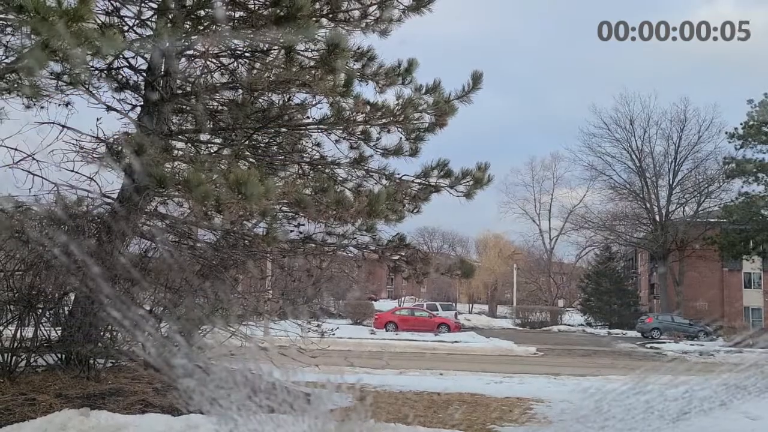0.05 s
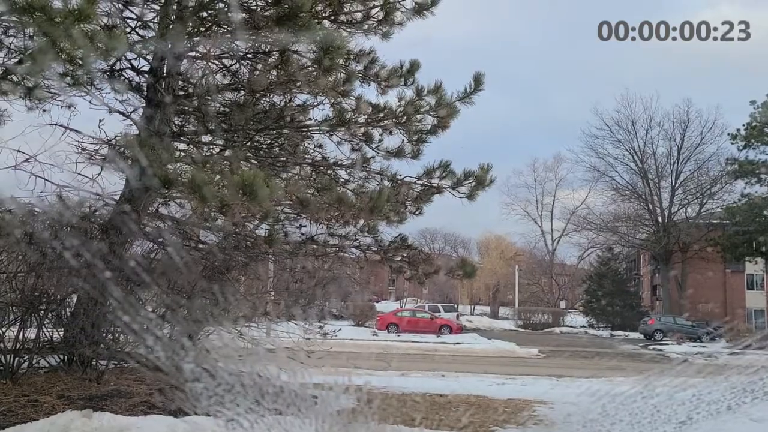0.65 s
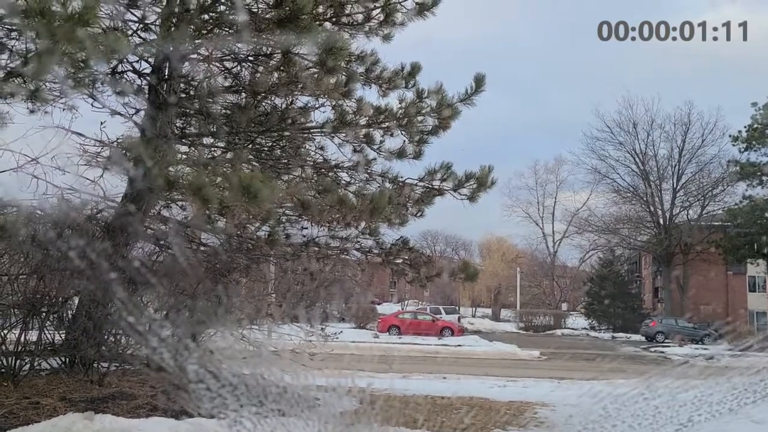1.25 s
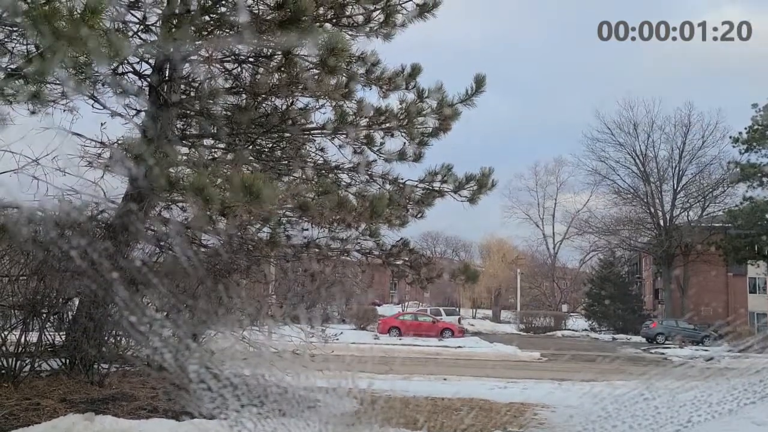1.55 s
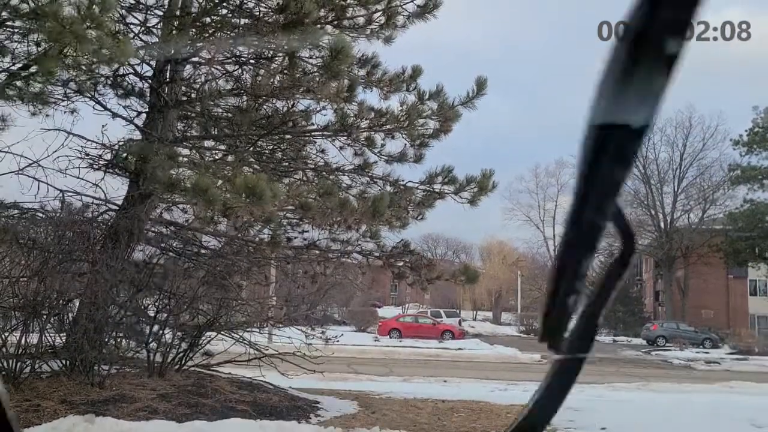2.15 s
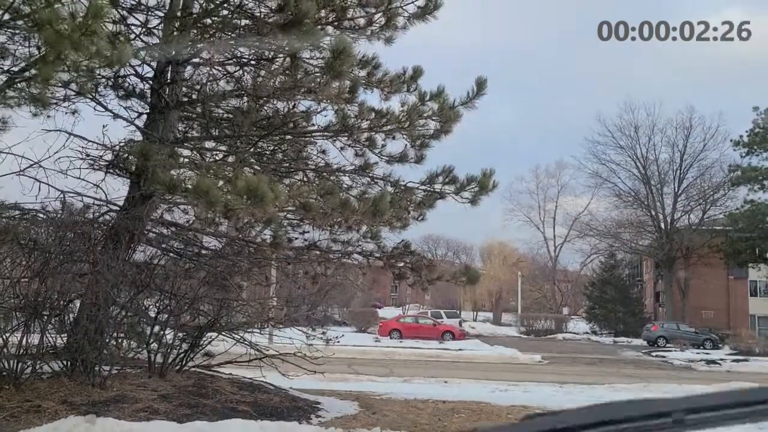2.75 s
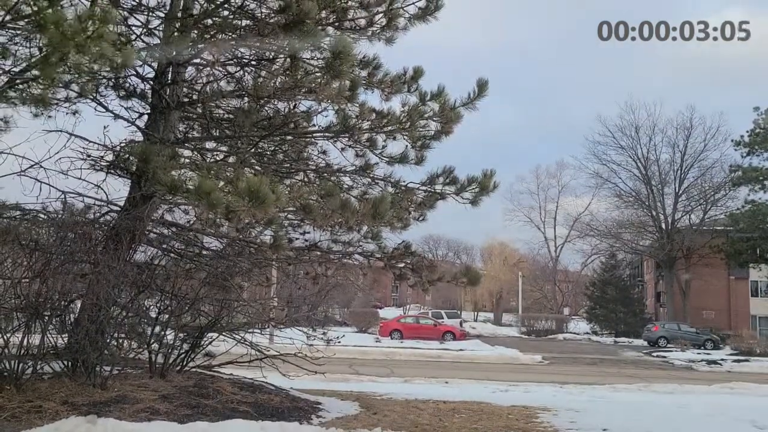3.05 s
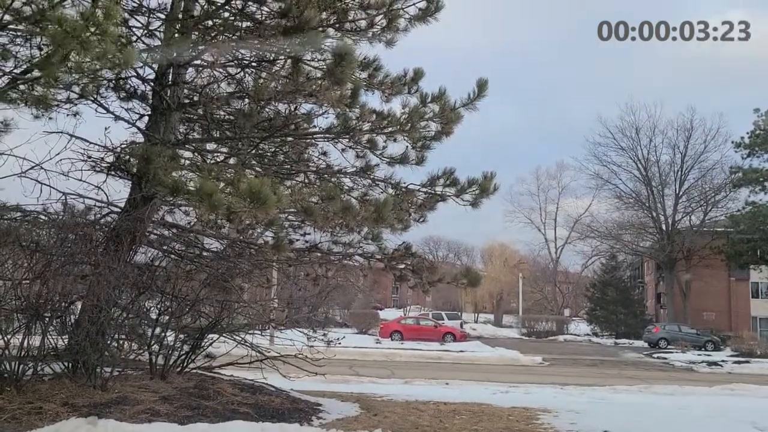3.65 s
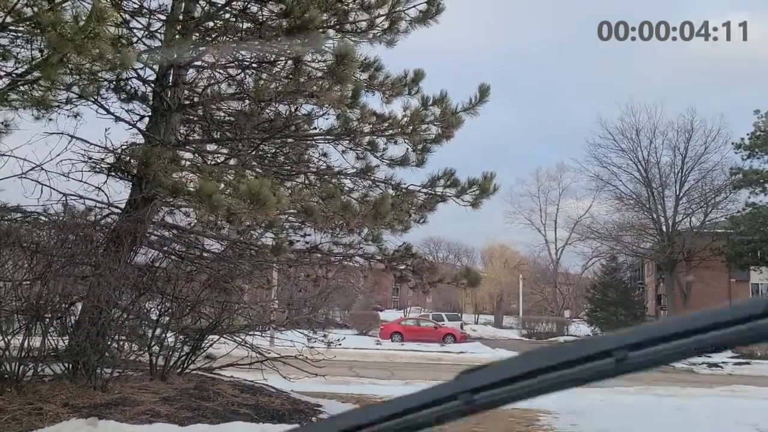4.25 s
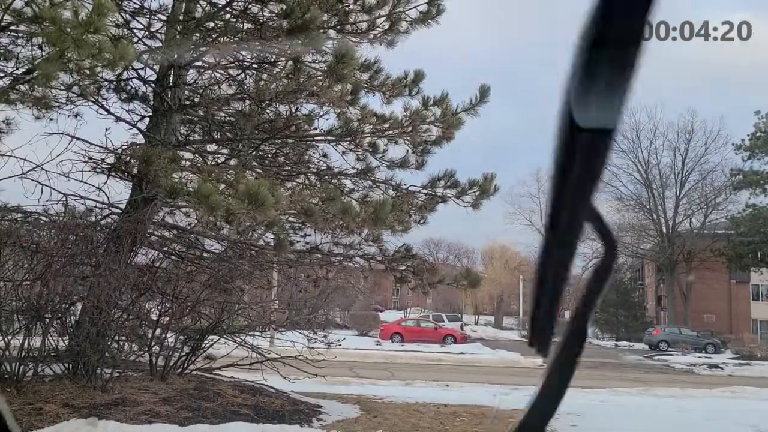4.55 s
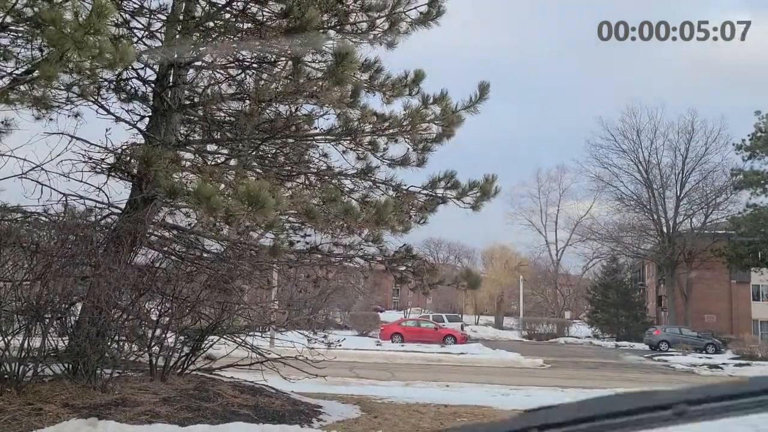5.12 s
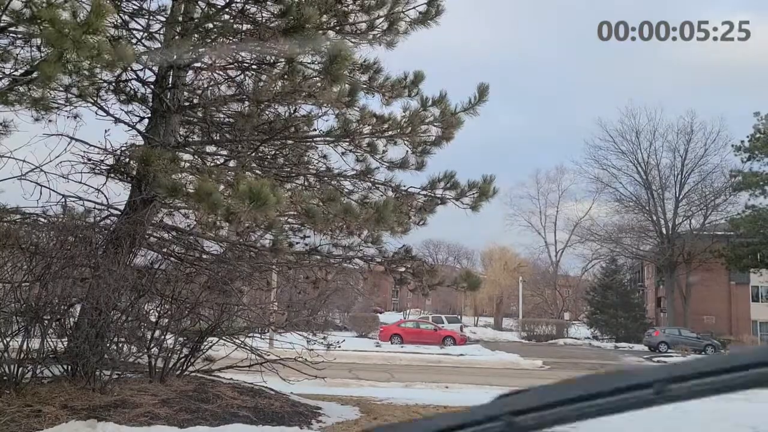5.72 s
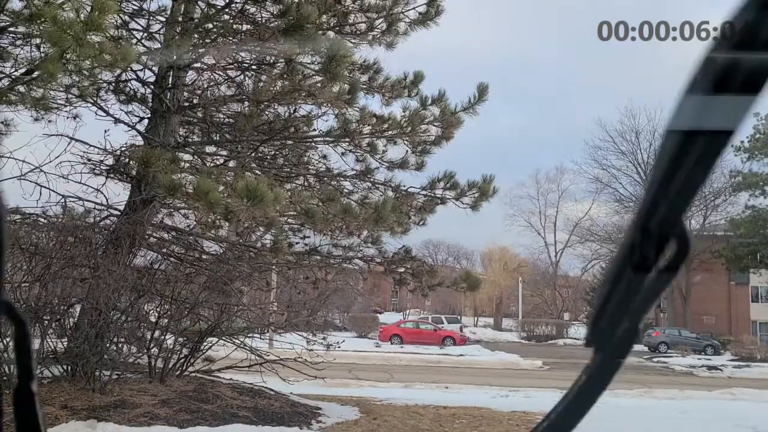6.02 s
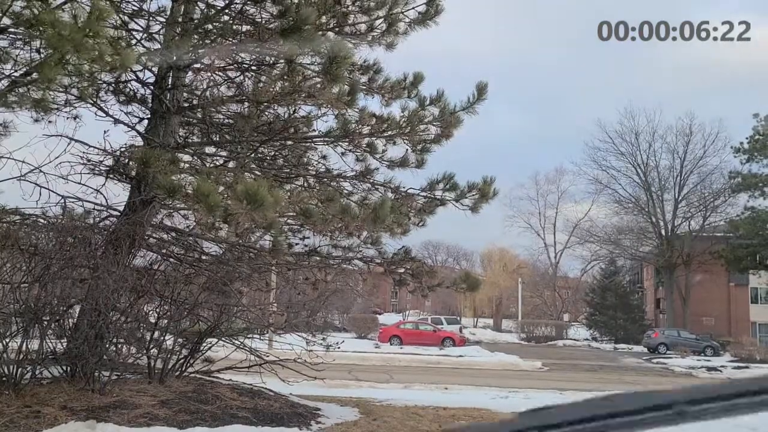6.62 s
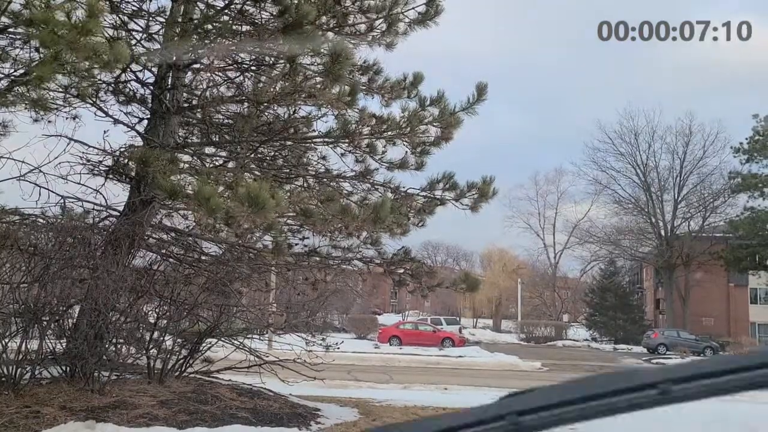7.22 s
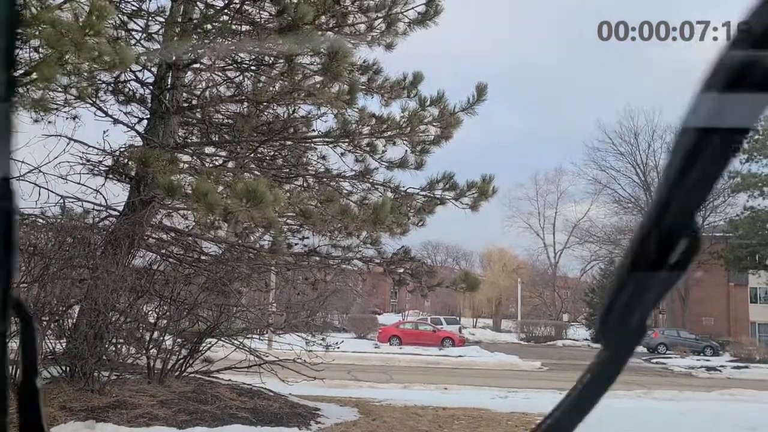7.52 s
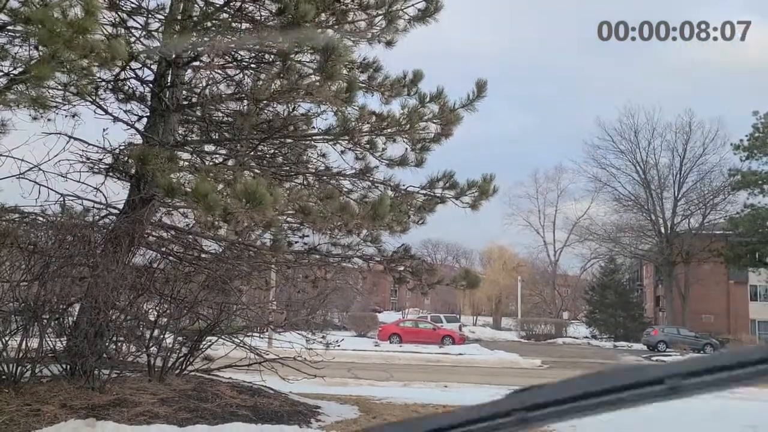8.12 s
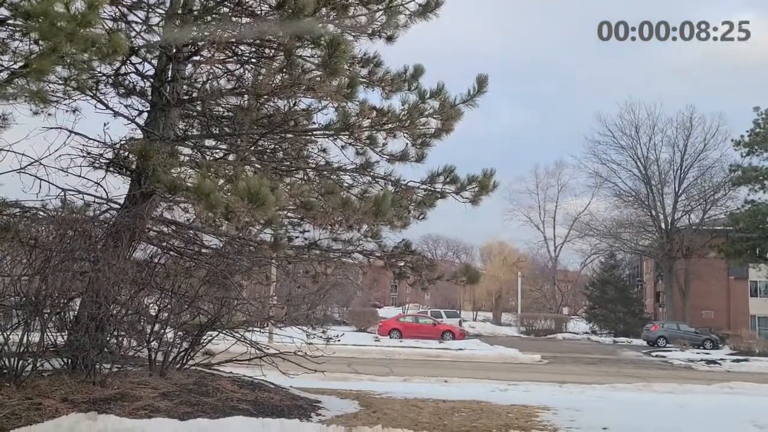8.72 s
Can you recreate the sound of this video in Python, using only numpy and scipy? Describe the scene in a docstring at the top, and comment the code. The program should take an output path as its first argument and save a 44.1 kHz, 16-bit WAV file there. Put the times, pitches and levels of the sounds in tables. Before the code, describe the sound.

A car engine idles with a steady low boom and cabin rumble throughout, heard in stereo from the front seat. A soft click comes at the very start. At 1.6 seconds a plastic stalk switch clacks close by and the wipers sweep the wet windshield with a thin motor whine and a faint rubber swish. The blades flip with a knock at 2.4 and land with a thud and short rubbery grunt at 3.1. After a pause, the switch clacks again at 4 seconds and three wipes follow without a break, turning at about 4.8, 6.3 and 7.8 and thudding down at 5.5, 7 and 8.5. The whine rises through each stroke, with a few faint ticks and scrapes. The switch gives a loud cluster of clacks around 7.7 and another clack at 8. The idle carries on alone until nearly 9 seconds.

```python
"""The low boom of an idling engine and a soft click, from a stereo microphone at a car's front seat.
Close by, the stalk switch clacks and rings its plastic housing. Ahead, wipers sweep the wet windshield:
one wipe, a pause, then three in a row. Their motor whines up through each stroke, the rubber swishes,
and at each turn the blades flip over with a stick-slip grunt and thud against the glass."""
import sys
import numpy as np
from scipy import signal
from scipy.fft import rfft, irfft
from scipy.io import wavfile
from scipy.ndimage import uniform_filter1d

SR = 44100
rng = np.random.default_rng(int(sys.argv[2]) if len(sys.argv) > 2 else 0)


def unload_wav(signal):
    """Save mono or channel-first audio to the path in sys.argv[1] as 16-bit WAV at rate SR, clipped to [-1, 1]."""
    wavfile.write(
        sys.argv[1],
        SR,
        np.round(np.clip(np.atleast_2d(signal).T, -1, 1) * 32767).astype(np.int16),
    )


N = 391166
TIME = np.arange(N) / SR


def amp(db):
    """Decibels to gain."""
    return 10 ** (np.asarray(db) / 20)


def unit(x):
    """Scales to rms 1."""
    return x / np.sqrt(np.mean(x ** 2) + 1e-20)


def curve(points, at):
    """Reads along straight lines between (x, value) points."""
    return np.interp(at, *np.transpose(points))


def log_curve(points, hz):
    """Reads (f/Hz, value) points on a log-frequency axis."""
    f, value = np.transpose(points)
    return np.interp(np.log(hz + 1), np.log(f), value)


def add(mix, s, sound):
    """Adds a sound into the mix at time s."""
    part = mix[:, max(round(s * SR), 0):][:, :sound.shape[-1]]
    part += sound[..., :part.shape[1]]


def drift(rate_hz):
    """Random wander of rms 1, mostly slower than rate_hz."""
    hz = np.fft.rfftfreq(N, 1 / SR)
    return unit(irfft(rfft(rng.standard_normal(N)) * np.exp(-(hz / rate_hz) ** 2), N))


def tone(hz, waver_db, wobble_rad, rate_hz):
    """A sine of rms 1 that wavers in level and phase."""
    phase = 2 * np.pi * np.cumsum(hz) / SR + wobble_rad * drift(rate_hz)[:len(hz)]
    return unit(np.sin(phase) * amp(waver_db * drift(rate_hz)[:len(hz)]))


def swell(length, peak_at):
    """Time axis and envelope of a short rub: a quick rise and a slower fall."""
    t = np.arange(0, length, 1 / SR)
    ramp = np.interp(t, [0, length * peak_at, length], [0, 1, 0])
    return t, np.sin(np.pi / 2 * ramp) ** 2


def strike(t, rise, t60):
    """Envelope of a blow: a quick rise, then a fall of 60 dB every t60 seconds."""
    return (1 - np.exp(-t / rise)) * amp(-60 * t / t60)


def grit(size, spread_db):
    """Two channels of white noise, roughened by a random level on every sample."""
    return rng.standard_normal((2, size)) * amp(spread_db * rng.standard_normal(size))


# likeness of left and right at the microphone: f/Hz, correlation
COHERENCE = [(40, 0.99), (150, 0.94), (300, 0.6), (600, 0)]
def coloured(spectrum, drive):
    """Two unrelated drives become a coloured stereo pair of rms 1, alike in the bass."""
    size = drive.shape[1]
    hz = np.fft.rfftfreq(size, 1 / SR)
    likeness = log_curve(COHERENCE, hz)
    mid, side = rfft(drive) * np.sqrt([1 + likeness, 1 - likeness]) * amp(log_curve(spectrum, hz))
    return unit(irfft([mid + side, mid - side], size))


def noise(spectrum, size):
    """Stereo noise of a given colour."""
    return coloured(spectrum, rng.standard_normal((2, size)))


# glass and dashboard near the microphone: left delay/s, right delay/s, gain
REFLECTIONS = [(.0019, .0021, .28), (.0032, .003, -.28), (.0047, .0049, .28)]
def reflected(x):
    """Nearby hard surfaces comb a stereo sound at unchanged power."""
    out = x.copy()
    for left, right, gain in REFLECTIONS:
        add(out[:1], left, gain * x[:1])
        add(out[1:], right, gain * x[1:])
    return np.std(x) * unit(out)


# rumble all round the microphone, and air from the vents: f/Hz, density/dB
RUMBLE = [(18, -24.5), (34, 6), (58, -1), (95, -4.5), (130, -5.5), (180, -15), (400, -18), (700, -31),
          (1100, -36), (1700, -52), (3000, -74), (16000, -110)]
VENTS = [(940, -30.5), (1900, -5.5), (2400, -10), (2870, -3), (3560, -10), (4100, -12), (4840, -18),
         (7550, -21), (8150, -26), (16000, -22)]
def cabin():
    """A steady rumble fills the car and the vents hiss faintly."""
    return amp(-40.5) * noise(RUMBLE, N) + amp(-77) * reflected(noise(VENTS, N))


# firing rate as the idle settles: t/s, f/Hz
IDLE = [(0, 38.1), (.9, 37.7), (1.6, 36.95), (2.7, 36.65), (5.2, 35.85), (6.8, 36), (7.6, 35.5),
        (8.87, 36.1)]
# engine boom at the seat: multiple of the firing rate, level/dB
BOOM = [(1, -40.5), (2, -39.5), (3, -55), (3.35, -46), (4, -43), (5, -62)]
# panel resonances that carry the belt whine: f/Hz, width/Hz, level/dB
PANELS = [(335.2, 15, -56.5), (509.8, 32, -64), (665.5, 22, -62), (785, 41, -63.5)]
def engine(settled_hz=36, shake_db_per_hz=.42, belt_ratio=4.455):
    """Firing orders boom, harder as the idle slows, under the thin whine of a belt-driven part."""
    firing_hz = curve(IDLE, TIME)
    shake_db = shake_db_per_hz * (settled_hz - firing_hz) - .28
    out = sum(amp(db + shake_db) * tone(k * firing_hz, waver_db=1.5, wobble_rad=.54, rate_hz=5)
              for k, db in BOOM)
    for k, (centre, width, db) in enumerate(PANELS, 2):
        # each belt overtone swells or fades as it slides across its resonance
        hz = k * belt_ratio * firing_hz
        gain = amp(db) / np.hypot(1, 2 * (hz - centre) / width)
        out += gain * tone(hz, waver_db=3, wobble_rad=.57, rate_hz=4)
    return out


# light ticks of the stalk and the blade holders: t/s, level/dB
TICKS = [(1.175, -65), (1.221, -62), (1.425, -61.5), (5.542, -59.5), (7.033, -60.5), (8.185, -56.5)]
# their colour: f/Hz, density/dB
TICK_COLOUR = [(600, -18.5), (1400, -0.5), (3200, 1.5), (5000, -20.5), (16000, -42.5)]
def ticks():
    """Small parts tap and rub against each other, dry and unpitched."""
    out, t = np.zeros((2, N)), np.arange(SR // 6) / SR
    shape = strike(t, rise=.0029, t60=.13)
    for s, db in TICKS:
        add(out, s, amp(db) * shape * coloured(TICK_COLOUR, grit(len(t), spread_db=3)))
    return out


def rest_tick(s=3.089, db=-57, t60=.041):
    """One fine, high tick as the arms settle after the first wipe."""
    out, t = np.zeros((2, N)), np.arange(SR // 10) / SR
    treble = noise([(6500, -32.5), (8500, -3.5), (12500, -5), (14500, -21)], len(t))
    add(out, s, amp(db - 60 * t / t60) * treble)
    return out


# wipes across the glass ahead: start t/s, far turn t/s, back at rest t/s
WIPES = [(1.638, 2.42, 3.13), (4.022, 4.8, 5.53), (5.537, 6.3, 7.03), (7.034, 7.818, 8.505)]
# the motor labours after each turn, speeds up and slows on landing: strokes done (0-2), f/Hz
WHINE_PITCH = [(0, 738), (.25, 703), (.9, 813), (.99, 812), (1.03, 735), (1.17, 716), (1.35, 746),
               (1.69, 815), (1.915, 816), (1.955, 742), (2, 705)]
# its whine at the seat: strokes done (0-2), level/dB
WHINE_LEVEL = [(0, -64), (.3, -63.5), (.72, -66.5), (.93, -61.5), (1.2, -60), (1.45, -64), (1.75, -60.5),
               (2, -63)]
# load in each wipe: pitch lost at the start/Hz, pitch lost at the end/Hz, landing gain/dB
LOAD = [(30, 0, 0), (6, 0, -1), (0, 0, -1), (0, 18, 7)]
def motor(coast_s=.08, coast_hz_per_s=2200, coast_db_per_s=220):
    """Gear whine follows the load through each wipe, then falls and fades as the motor coasts."""
    out = np.zeros((2, N))
    for (start, turn, end), (start_hz, end_hz, landing_db) in zip(WIPES, LOAD):
        t = np.arange(start, end + coast_s, 1 / SR)
        strokes = np.interp(t, [start, turn, end], [0, 1, 2])
        coasted = np.maximum(t - end, 0)
        sag_hz = np.interp(strokes, [0, 1, 2], [start_hz, 0, end_hz])
        strain_db = np.interp(strokes, [1.65, 1.95], [0, landing_db])
        hz = curve(WHINE_PITCH, strokes) - sag_hz - coast_hz_per_s * coasted
        db = curve(WHINE_LEVEL, strokes) + strain_db - coast_db_per_s * coasted
        whine = tone(hz, waver_db=2.3, wobble_rad=.62, rate_hz=34)
        add(out, start, amp(db) * whine * signal.windows.tukey(len(t), .015))
    return out


# catches on the outside of the glass: t/s, level/dB, length/s, centre f/Hz
SCRAPES = [(2.541, -77, 0.057, 7000), (2.904, -75, .016, 5500), (5.063, -58, 0.067, 3580),
           (5.804, -70.5, .08, 3100), (6.436, -73.5, 0.02, 6000), (6.895, -70.5, 0.036, 2900)]
# their colour: multiple of the centre, density/dB
SCRAPE_HUMP = [(.25, -13.5), (1, -0.5), (1.4, -13), (3, -33)]
def scrapes(grain_db=4):
    """Wet rubber catches on drops and grit in short, grainy scrapes."""
    out = np.zeros((2, N))
    for s, db, length, hz in SCRAPES:
        t, shape = swell(length, peak_at=.25)
        grains = rng.standard_normal((2, len(t))) * amp(grain_db * drift(600)[:len(t)])
        hump = [(k * hz, height) for k, height in SCRAPE_HUMP]
        add(out, s, amp(db) * shape * coloured(hump, grains))
    return out


# sliding rubber and wet hiss, heard from inside: f/Hz, density/dB
RUB = [(500, -20), (1200, 0.5), (2950, -0.5), (4100, -9), (4800, -15.5), (8000, -24), (16000, -33.5)]
HISS = [(2000, -17.5), (4500, 0), (7500, 0), (9000, -9), (13000, -5.5), (16000, -15.5)]
# grip in each wipe: level the return rub builds to/dB, far turn gain/dB, judder gain/dB
GRIP = [(-67.5, 0.5, 1.5), (-65, 0.5, 2), (-74, 1, -12), (-67.5, 1, -4)]
# soft swells: middle t/s, half width/s, rustle level/dB, hiss level/dB
SWELLS = [(.15, 0.63, -75, -95), (1.3, 0.27, -77.5, -85.5), (5.118, 0.13, -67.5, -67.5),
          (7.6, 0.15, -65, -76), (7.95, 0.071, -65.5, -75), (8.2, 0.35, -75, -77.5)]
def swish(outward_db=-76, wet_db=-87, build_db=8, speed_power=.21, fade_s=.11):
    """Rubber drags over the glass, louder with blade speed; a finely grained hiss swells now and then."""
    rub, hiss = np.zeros((2, N))
    for wipe, (back_db, _, _) in zip(WIPES, GRIP):
        strokes = np.interp(TIME, wipe, [0, 1, 2])
        sliding = abs(np.sin(np.pi * strokes)) ** speed_power
        return_db = back_db - build_db * (2 - strokes)  # the rub builds on the drier way back
        rub += sliding * amp(np.where(strokes < 1, outward_db, return_db))
        hiss += sliding * amp(wet_db)
    rub, hiss = uniform_filter1d([rub, hiss], round(fade_s * SR))
    for s, width, rustle_db, hiss_db in SWELLS:
        bell = np.exp(-((TIME - s) / width) ** 2)
        rub = np.hypot(rub, amp(rustle_db) * bell)
        hiss = np.hypot(hiss, amp(hiss_db) * bell)
    drops = rng.standard_normal((2, N)) * amp(1.8 * drift(400))
    flutter = amp(2 * drift(24))
    return rub * flutter * noise(RUB, N) + hiss * coloured(HISS, drops)


# colour of a scuff: multiple of its centre, density/dB
SCUFF_HUMP = [(.25, -3), (.65, -3), (1, 1.5), (1.4, -8), (2, -18.5), (3.5, -24), (7, -66.5)]
# the windshield between blade and microphone: f/Hz, gain/dB
GLASS = [(3000, -3), (4500, -12.5), (9000, -34)]
def scuff(db, hz, length):
    """A short rub with one broad hump, dulled by the glass."""
    t, shape = swell(length, peak_at=.16)
    hump = [(k * hz, height + log_curve(GLASS, k * hz)) for k, height in SCUFF_HUMP]
    return amp(db) * shape * noise(hump, len(t))


def grunt(db, hz, length, overtone_db=-24, jitter=.096):
    """The rubber lip sticks and slips for a few cycles as it folds."""
    t, shape = swell(length, peak_at=.077)
    phase = 2 * np.pi * np.cumsum(hz * (1 + jitter * drift(170)[:len(t)])) / SR
    return amp(db) * shape ** .76 * (np.sin(phase) + amp(overtone_db) * np.sin(2 * phase))


def run_ons():
    """Start times of the wipes that follow the one before without a pause."""
    return [start for (_, _, end), (start, _, _) in zip(WIPES, WIPES[1:]) if start - end < .1]


# the blades land at the foot of the glass: t/s, scuff level/dB, bump level/dB
LANDINGS = [(3.063, -49.5, -21), (5.44, -53, -21.5), (6.943, -57.5, -22.5), (8.466, -55.5, -24)]
# then the rubber lip folds over: t/s, level/dB
FOLDS = [(3.1, -26), (5.476, -25), (6.98, -26.5), (8.535, -34.5)]
def flips(fold_hz=290.5):
    """The blades flip at the far turn, scuff and fold on landing, and fold back if they run on."""
    out = np.zeros((2, N))
    for (_, turn, _), (_, turn_db, judder_db) in zip(WIPES, GRIP):
        add(out, turn - .107, grunt(judder_db - 33.5, hz=280, length=.03))  # judder
        add(out, turn - .098, scuff(judder_db - 39.5, hz=310, length=.17))  # drag
        add(out, turn - .022, scuff(turn_db - 42, hz=656, length=.05))  # slap
        add(out, turn - .013, grunt(turn_db - 31.5, hz=277, length=.029))  # fold
    for s, db, _ in LANDINGS:
        add(out, s, scuff(db, hz=2240, length=.03))
    for s, db in FOLDS:
        add(out, s, grunt(db, fold_hz, length=.051))
        add(out, s, scuff(db - 24, hz=684, length=.041))
    for start in run_ons():
        add(out, start + .008, grunt(-35.5, fold_hz, length=.03))
    return out


# the linkage takes up slack at the start; the arms rock at the far turn: delay/s, level/dB, f/Hz
LINKAGE_KICK = [(0, -17.5, 71.3), (.026, -22.5, 64.7)]
ARM_ROCK = [(-.05, -25, 134.6), (-.005, -23, 136), (0.02, -22.5, 95), (0.076, -25.5, 73.6)]
# throws of the stalk jolt the steering column: t/s, level/dB
THROWS = [(0.029, -36), (1.563, -23.5), (3.973, -25.5), (7.683, -18), (7.712, -24), (8.006, -25)]
def thuds(bump_hz=66.8, swing_hz=66, column_hz=127.4, rebound_s=.027, rise=.0087):
    """Glass and dashboard swing for a few cycles after each jolt, then the cabin rumbles on briefly."""
    jolts = [(s + .0184, db, bump_hz) for s, _, db in LANDINGS]
    for (start, turn, _), (_, turn_db, _) in zip(WIPES, GRIP):
        jolts += [(start + delay, db, hz) for delay, db, hz in LINKAGE_KICK]
        jolts += [(turn + delay, turn_db + db, hz) for delay, db, hz in ARM_ROCK]
    for s, db in THROWS:
        jolts += [(s, db, column_hz), (s + rebound_s, db, column_hz)]
    # the arms swing deeper when one wipe runs straight into the next
    jolts += [(start + .0206, -19.5, swing_hz) for start in run_ons()]
    out, t = np.zeros((2, N)), np.arange(SR // 4) / SR
    push = (t / rise * np.exp(1 - t / rise)) ** 2
    tail = amp(-13) * strike(t, rise, t60=.4)
    for s, db, hz in jolts:
        swing = push * np.cos(2 * np.pi * hz * (t - rise))
        rumble = noise([(hz / 2, -20), (hz, 0), (hz * 2, -6), (hz * 10, -60), (SR / 2, -120)], len(t))
        add(out, s, amp(db) * (swing + tail * rumble))
    return out


def ringing(modes, t, detune, rise, echo_t60, scatter):
    """Struck modes, each detuned a little by the point of contact, with quick echoes off the dashboard."""
    ring = sum(amp(db) * strike(t, rise, t60) * np.sin(2 * np.pi * hz * rng.normal(1, detune) * t)
               for hz, db, t60 in modes)
    echoes = rng.standard_normal((2, len(t))) * amp(-60 * t / echo_t60)
    echoes *= scatter / np.linalg.norm(echoes[0])
    scattered = signal.fftconvolve(echoes, ring[None], axes=1)[:, :len(t)]
    return np.std(ring) * unit(ring + scattered)


# blows of the arms and, close to the microphone, of the switch (release, stop, rebound):
# t/s, then level/dB of snap, stalk, housing, spring, hollow body
CLACKS = [(.024, -47, -38, -32, -37.5, -38), (.033, -42.5, -39, -38, -45, -30),
          (1.551, -31.5, -31, -55, -37, -55), (1.561, -37, -20.5, -26, -36, -22),
          (1.58, -48.5, -50, -42, -52, -23.5), (3.957, -29.5, -38, -67, -48, -49.5),
          (3.965, -37, -20.5, -28, -31.5, -27.5), (3.984, -50, -49, -51, -56, -24.5),
          (5.047, -46, -66, -66, -42.5, -45), (7.518, -52, -67, -66, -63, -68),
          (7.58, -56.5, -48.5, -38, -55, -34), (7.619, -56, -46, -36, -57, -50),
          (7.67, -37.5, -32, -29, -32, -37), (7.678, -29.5, -27, -17.5, -40, -23),
          (7.696, -39, -27, -24.5, -39, -26.5), (7.707, -22, -36, -40, -23.5, -29),
          (7.713, -28.5, -21, -20.5, -39, -25.5), (7.742, -38.5, -20.5, -22, -38, -30.5),
          (7.81, -60, -56, -59, -65, -26), (7.987, -37.5, -34.5, -29, -35, -32.5),
          (8, -37.5, -28, -33, -34, -27), (8.018, -59, -42, -38, -51, -31.5)]
# colours of the bright snap and the hollow body: f/Hz, density/dB
SNAP = [(300, -24.5), (1100, -8), (1550, -0.5), (2600, 1), (3500, -1), (5000, -7), (8000, -12.5),
        (12500, -17), (16000, -24)]
BODY = [(100, 1.5), (220, 0), (400, 1), (550, -4), (670, -10.5), (1200, -17.5), (5000, -75)]
# modes of plastic stalk, switch housing, detent spring, column shroud, and the detent spring's zing: f/Hz,
# level/dB, t60/s
STALK = [(1435, -12.5, 0.064), (1525, 0, 0.029)]
HOUSING = [(790, -3, 0.032), (1149, -5.5, 0.035), (1268, 0.5, 0.016)]
SPRING = [(2396, 1.5, 0.02), (2695, -6, .028), (3375, -10, 0.06)]
SHROUD = [(513, -2.5, 0.09), (555, 2, 0.063), (726, -8.5, 0.063)]
SPRING_ZING = [(3120, 3, 0.046), (3380, -3, 0.049)]
# hard stops shake the shroud; the detent spring zings after a throw: t/s, level/dB
CLUNKS = [(7.682, -24), (8.006, -24.5)]
ZINGS = [(1.586, -45.5), (3.988, -49)]
def clacks(snap_rise=.0034, cabin_db=-18, cabin_t60=.26):
    """Each blow snaps, rings the switch parts and wakes the hollow body; the cabin adds a short tail."""
    out, t = np.zeros((2, N)), np.arange(SR // 4) / SR
    crack = amp(5) * strike(t, snap_rise, t60=.012) + amp(-3) * strike(t, snap_rise, t60=.074)
    for s, *levels in CLACKS:
        snap = reflected(coloured(SNAP, grit(len(t), spread_db=3.6)) * crack)
        tail = noise(RUB, len(t)) * amp(cabin_db - 60 * t / cabin_t60)
        stalk = ringing(STALK, t, detune=.012, rise=.002, echo_t60=.06, scatter=.35)
        housing = ringing(HOUSING, t, detune=.013, rise=.001, echo_t60=.087, scatter=.81)
        spring = ringing(SPRING, t, detune=.0091, rise=.0011, echo_t60=.075, scatter=.84)
        body = noise(BODY, len(t)) * strike(t, rise=.0029, t60=.12)
        for db, part in zip(levels, [snap + tail, stalk, housing, spring, body]):
            add(out, s, amp(db) * part)
    for s, db in CLUNKS:
        add(out, s, amp(db) * ringing(SHROUD, t, detune=.0097, rise=.0021, echo_t60=.043, scatter=.35))
    for s, db in ZINGS:
        add(out, s, amp(db) * ringing(SPRING_ZING, t, detune=.0072, rise=.0012, echo_t60=.05, scatter=.4))
    return out


def scene():
    """Everything that reaches the microphone at the front seat."""
    out = engine() + cabin() + motor() + clacks() + thuds() + flips()
    return out + reflected(swish() + scrapes() + ticks() + rest_tick())


def record(dry, edge_hz=15800):
    """The recorder's band limit."""
    lowpass = signal.firwin(511, edge_hz, window=("kaiser", 9), fs=SR)
    return signal.oaconvolve(dry, lowpass[None], "same", axes=1)


dry = scene()
out = record(dry)
unload_wav(out)
```